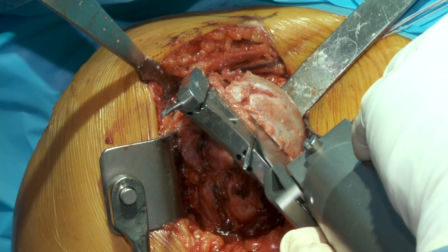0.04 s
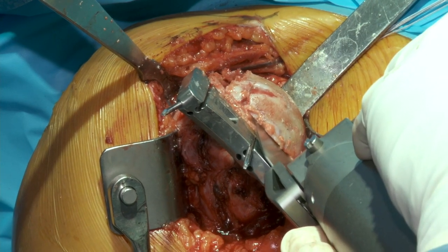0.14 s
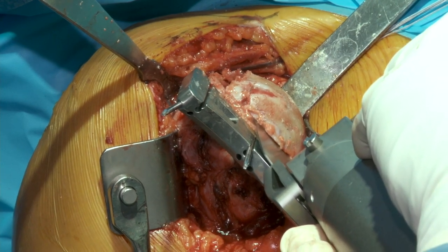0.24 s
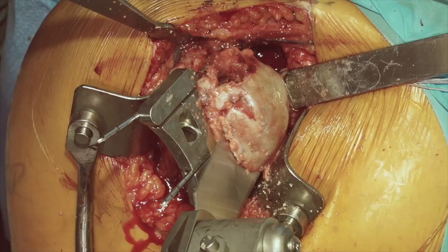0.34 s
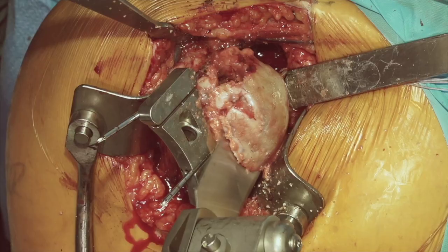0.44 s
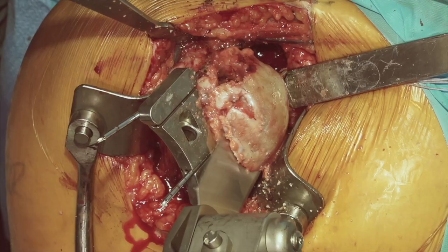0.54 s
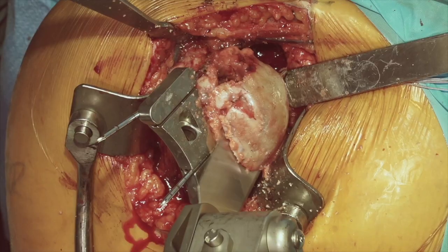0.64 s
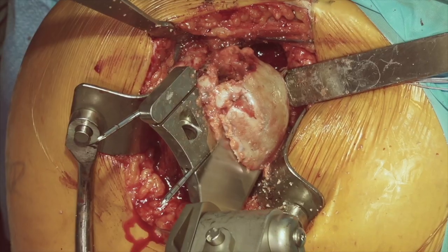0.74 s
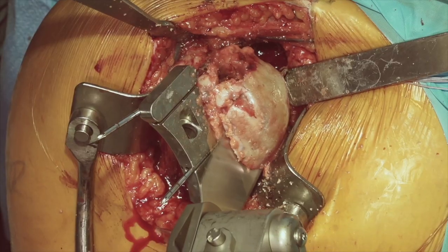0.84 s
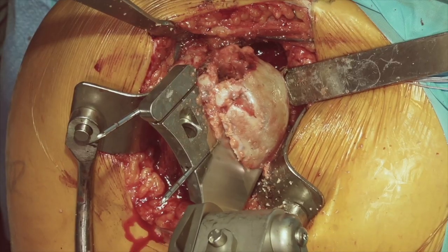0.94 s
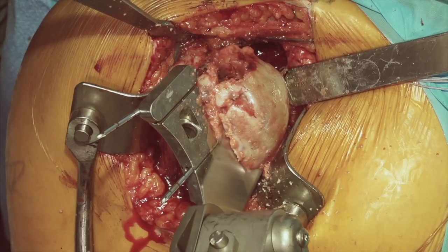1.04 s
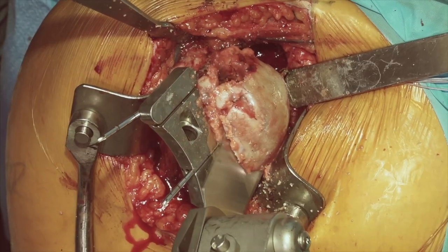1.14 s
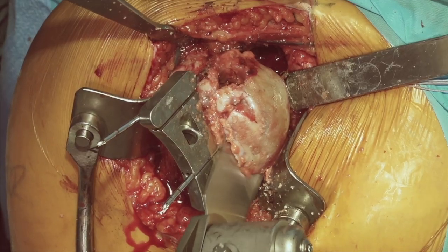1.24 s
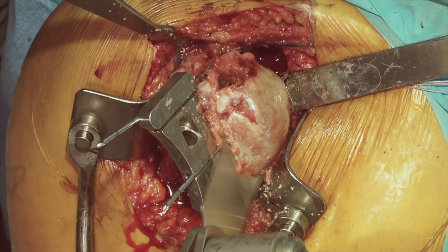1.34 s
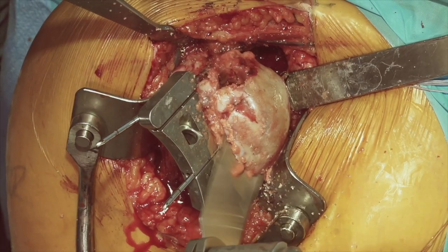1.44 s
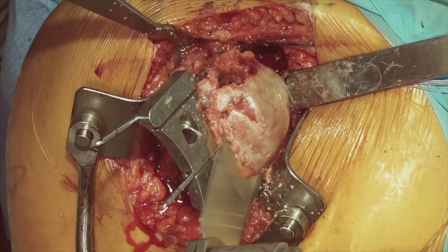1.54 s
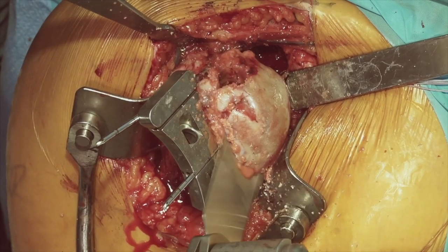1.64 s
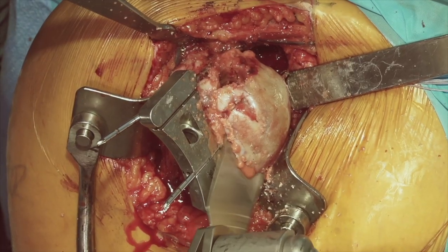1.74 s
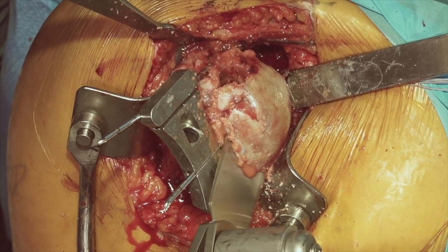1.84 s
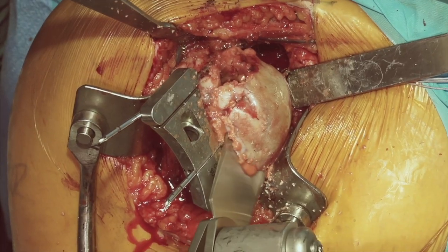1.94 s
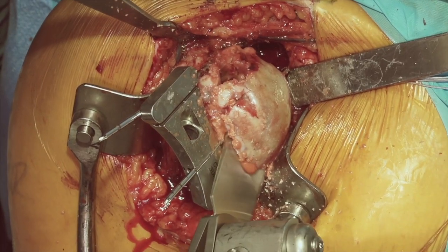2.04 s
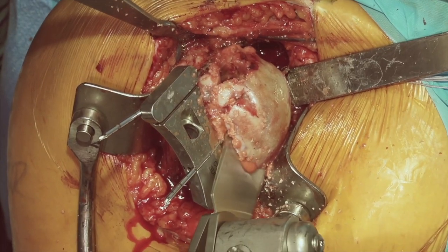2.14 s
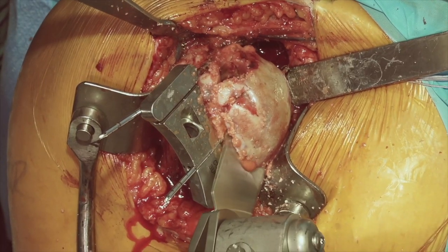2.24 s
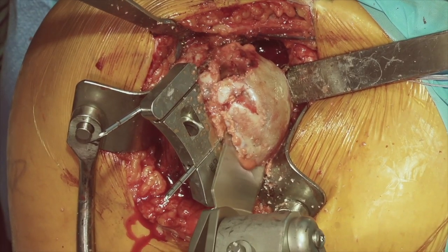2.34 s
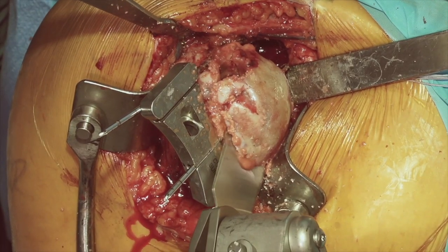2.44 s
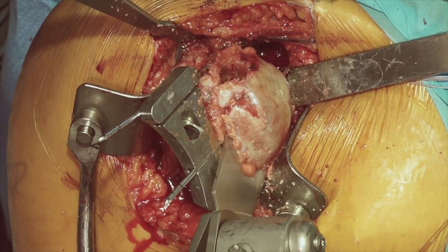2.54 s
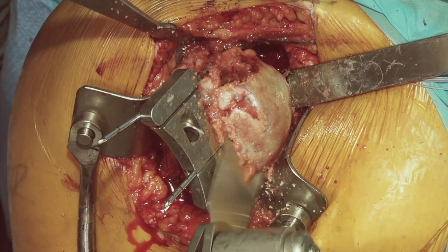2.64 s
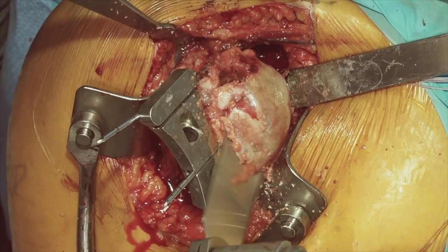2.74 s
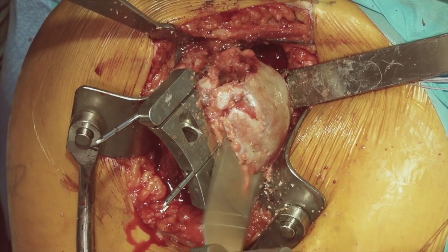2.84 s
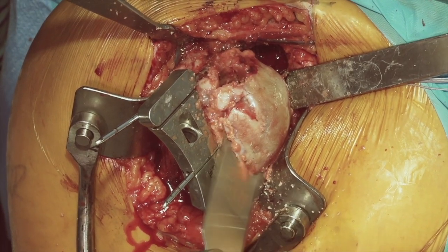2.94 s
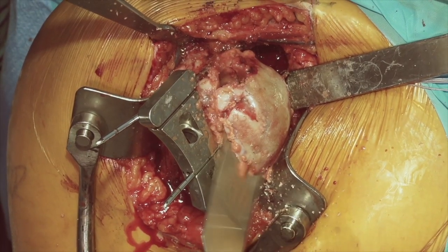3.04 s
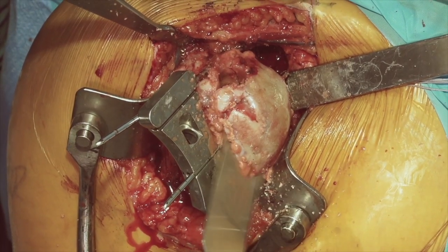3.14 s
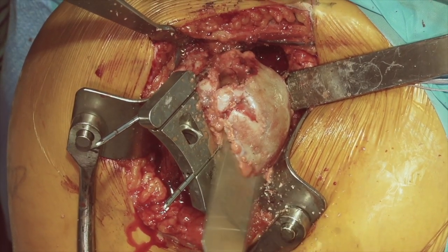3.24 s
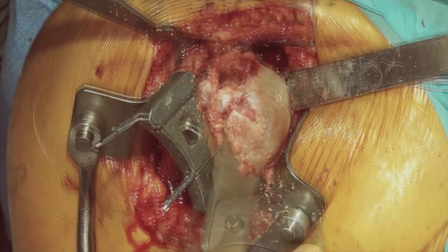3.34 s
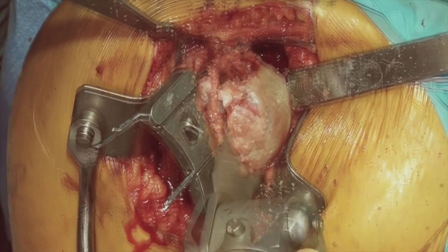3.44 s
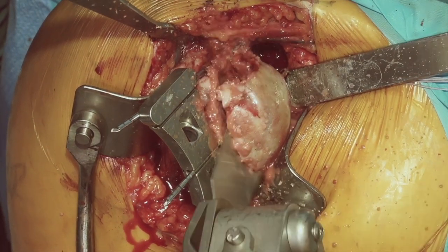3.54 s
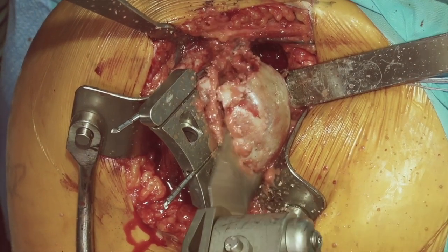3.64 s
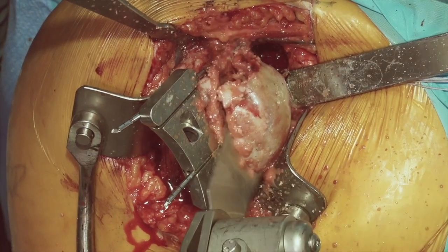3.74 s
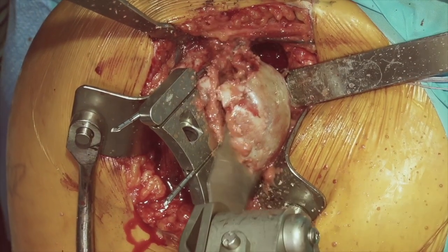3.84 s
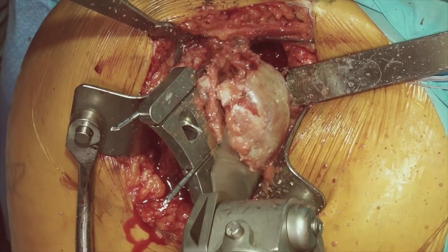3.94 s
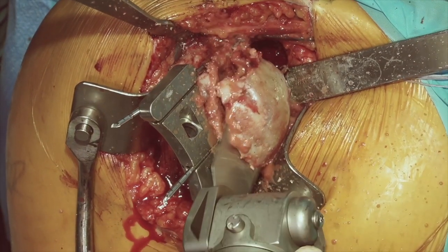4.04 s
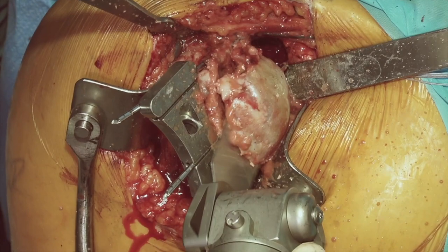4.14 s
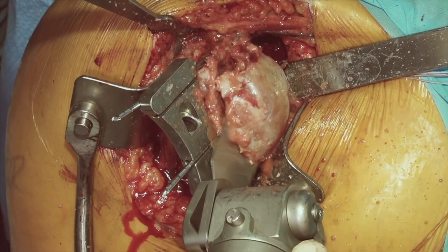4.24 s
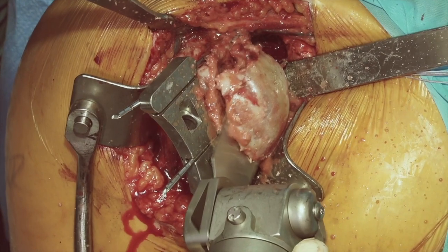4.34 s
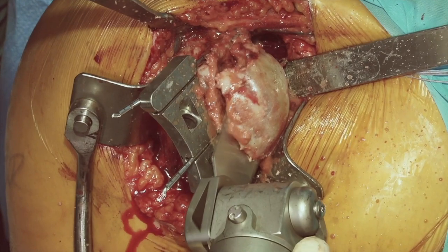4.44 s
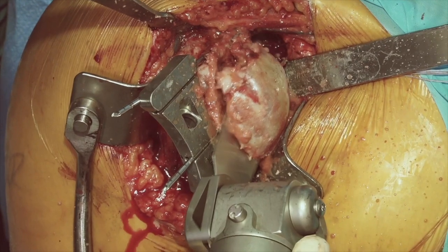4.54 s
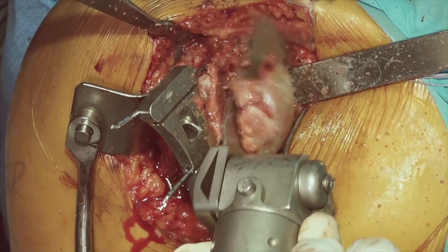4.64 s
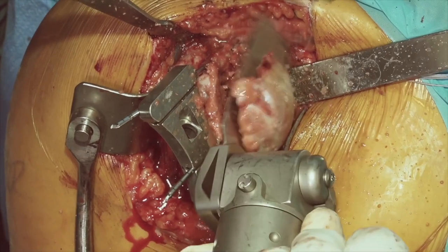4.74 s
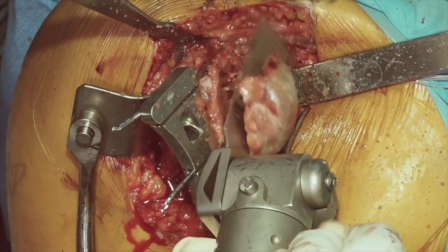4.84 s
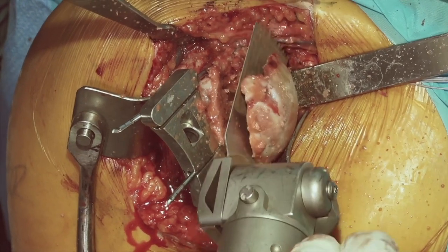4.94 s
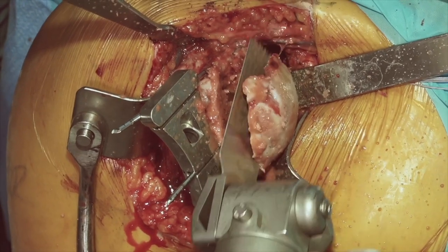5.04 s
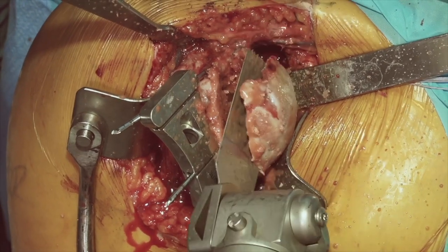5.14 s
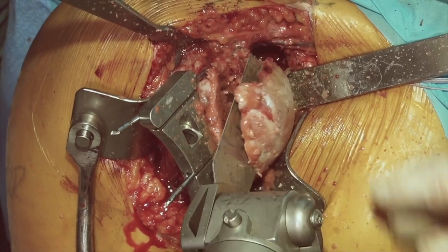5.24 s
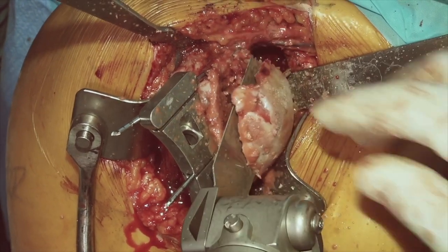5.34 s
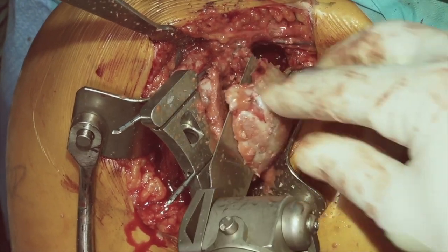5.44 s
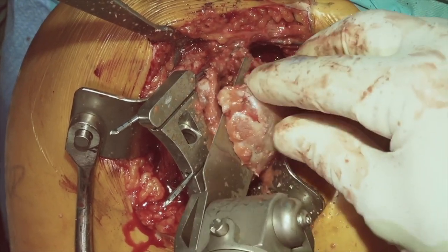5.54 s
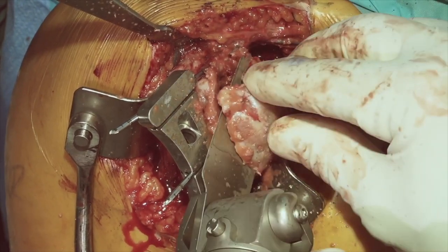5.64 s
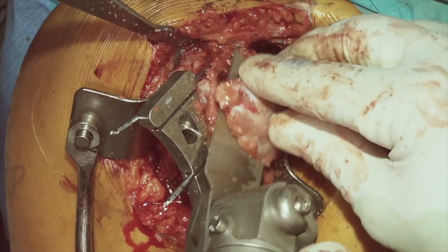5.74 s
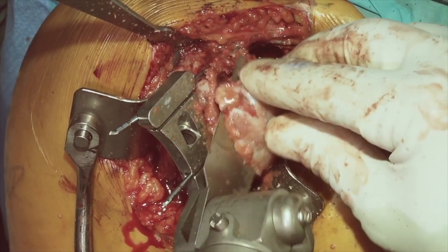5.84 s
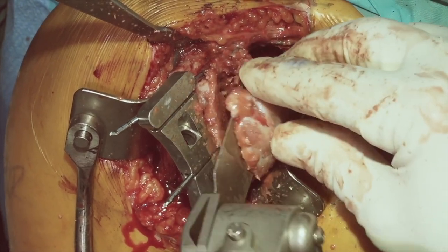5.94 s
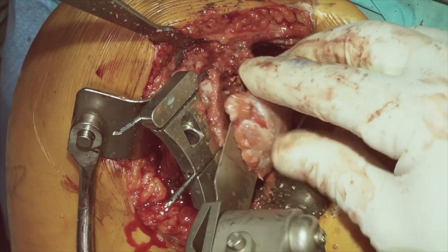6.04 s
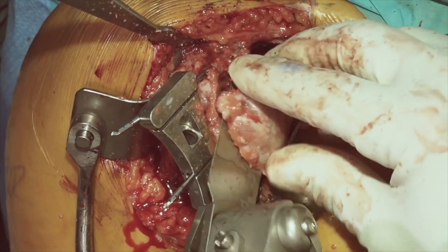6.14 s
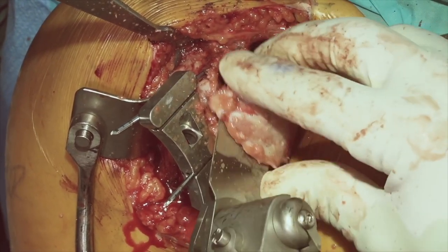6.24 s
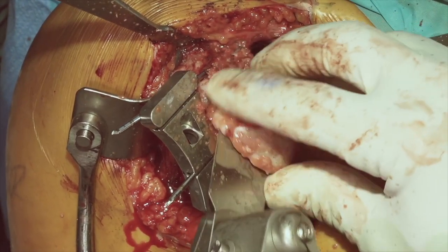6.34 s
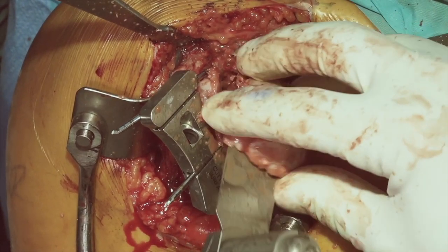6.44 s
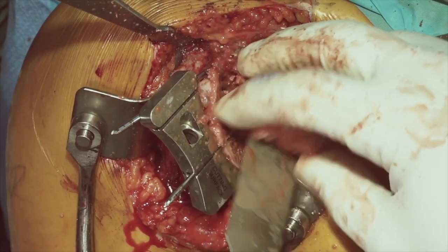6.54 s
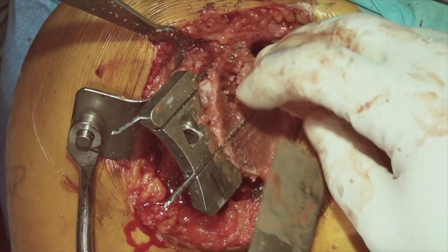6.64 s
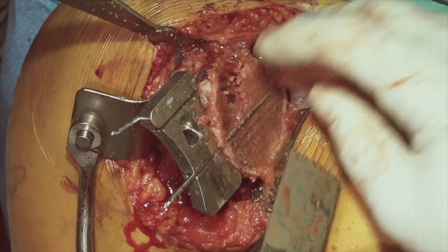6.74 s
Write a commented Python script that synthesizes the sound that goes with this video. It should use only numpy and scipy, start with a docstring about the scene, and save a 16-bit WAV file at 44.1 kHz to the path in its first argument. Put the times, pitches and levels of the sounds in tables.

```python
"""First heard, close to the microphone in an operating room: a powered oscillating saw cuts bone along a steel guide.
Knocks and tooth contacts on every stroke excite steel colours and resonances, with chatter, skids and rasps.
It cracks through and stops. Under it lie shaped-noise hiss like suction, low rumble swells, air and faint tones.
Then come soft ticks from bursts of grit, rubbing gloves with one sine squeak, and a blade rung by friction noise."""
import sys
import numpy as np
from scipy import signal
from scipy.fft import rfft, irfft
from scipy.io import wavfile
from scipy.ndimage import uniform_filter1d, map_coordinates

SR = 44100
rng = np.random.default_rng(int(sys.argv[2]) if len(sys.argv) > 2 else 0)


def persist_wave(psi):
    """Save psi, clipped to +-1, as 16-bit WAV."""
    counts = np.round(np.clip(psi, -1, 1) * 32767).astype(np.int16)
    wavfile.write(sys.argv[1], SR, np.atleast_2d(counts).T)


N = 299880


def from_db(db):
    """Decibels to gain."""
    return 10 ** (np.asarray(db) / 20)


def rms_one(x):
    """Scale to unit rms."""
    return x / np.sqrt(np.mean(x ** 2) + 1e-20)


def seconds():
    """Time of every sample."""
    return np.arange(N) / SR


def in_time(rows):
    """Each column of a curve at every sample."""
    s, *columns = np.transpose(rows)
    return [np.interp(seconds(), s, c) for c in columns]


def ramp(middle_s, takes_s):
    """Straight rise from 0 to 1, half way at middle_s."""
    return np.clip((seconds() - middle_s) / takes_s + .5, 0, 1)


def spell(start_s, end_s, fade_s):
    """Rise at start_s and fall at end_s."""
    return ramp(start_s, fade_s) - ramp(end_s, fade_s)


def snap(start_s, decay_s):
    """An abrupt rise and an exponential fall."""
    age = seconds() - start_s
    return (age > 0) * np.exp(-np.abs(age) / decay_s)


def drift(rate, t):
    """Smooth random curve around 0 with a spread near 1, `rate` knots per unit of t."""
    knots, fine = 512, 16
    curve = signal.resample(rng.standard_normal(knots), knots * fine)
    return np.interp(t * rate % knots * fine, np.arange(knots * fine), curve)


def coloured(x, spectrum):
    """Give x a smooth spectrum; rms 1."""
    hz, db = np.transpose(spectrum)
    bins = np.maximum(np.fft.rfftfreq(N, 1 / SR), 1)
    gain = from_db(np.interp(np.log(bins), np.log(hz), db))
    return rms_one(irfft(rfft(x) * gain, N))


def band(x, low_hz, high_hz, order=4):
    """Butterworth band-pass."""
    return signal.sosfilt(signal.butter(order, [low_hz, high_hz], "band", fs=SR, output="sos"), x)


def resonance(x, hz, width_hz):
    """One resonance with gain near 1 on top."""
    r = np.exp(-np.pi * width_hz / SR)
    zeros = np.array([1, 0, -1]) * (1 - r * r) / 2
    return signal.lfilter(zeros, [1, -2 * r * np.cos(2 * np.pi * hz / SR), r * r], x)


def evened(x, span_s=0.15):
    """Hold the short-term rms near 1."""
    size = int(span_s * SR / 2)
    power = uniform_filter1d(uniform_filter1d(x * x, size), size)
    return x / np.sqrt(np.abs(power) + 1e-12)


def lifted(x, rows, fade_s):
    """Blade modes swell and fade as the free length and the grip of the slot change."""
    out = x
    for start, end, hz, width_hz, lift_db in rows:
        grip = spell(start, end, fade_s)
        out = out + grip * (from_db(lift_db) - 1) * resonance(x, hz, width_hz)
    return out


# dull colour of the room air, also of the gloves' rub: f/Hz, relative level/dB per Hz
DULL_COLOUR = [(25, -8.5), (65, 1), (150, -6.5), (350, -5), (570, -7), (1200, -13), (1800, -16),
               (3400, -22.5), (5000, -22.5), (8000, -67)]
AIR_DB = -67.5


def room_air():
    """Steady noise of the room, coloured dull."""
    return from_db(AIR_DB) * coloured(rng.standard_normal(N), DULL_COLOUR)


# equipment tones: f/Hz, rms level/dB around which each wavers
EQUIPMENT_TONES = [(1570, -80.5), (586, -84), (3564, -92)]
TONE_WAVER_DB, TONE_WAVER_PER_S = 2.6, 9.0


def equipment():
    """Steady sine pitches whose levels waver independently."""
    t, out = seconds(), 0
    for hz, db in EQUIPMENT_TONES:
        level = from_db(db + TONE_WAVER_DB * drift(TONE_WAVER_PER_S, t))
        out = out + level * np.sqrt(2) * np.sin(2 * np.pi * hz * t)
    return out


# swells of rumble: t/s at the top, level/dB added to the bed
RUMBLE_SWELLS = [(.5, -60), (2.82, -56.5), (5.0, -64), (6.78, -55.5)]
SWELL_RISE_S, SWELL_FALL_S, RUMBLE_BED_DB = 0.14, 0.17, -72


def swells():
    """Gain of the rumble: a steady bed and swells that rise faster than they fall."""
    t, gain = seconds(), from_db(RUMBLE_BED_DB)
    for top_s, db in RUMBLE_SWELLS:
        side_s = np.where(t < top_s, SWELL_RISE_S, SWELL_FALL_S)
        gain = gain + from_db(db) * np.exp(-((t - top_s) / side_s) ** 2)
    return gain


# colour of the rumble: f/Hz, relative level/dB per Hz
RUMBLE_COLOUR = [(25, -21), (50, -21), (100, -3), (160, 0), (220, -2.5), (330, -10.5), (600, -24),
                 (1200, -63)]


def rumble():
    """Low noise that swells."""
    return swells() * coloured(rng.standard_normal(N), RUMBLE_COLOUR)


# thin hiss before its trim: t/s, level/dB
HISS_CURVE = [(4.9, -58), (5.15, -60), (5.4, -65), (5.7, -61.5), (6.1, -58.5), (6.55, -60), (6.8, -55.5)]
# colour of the hiss: f/Hz, relative level/dB per Hz
HISS_COLOUR = [(1200, -34), (2500, -19), (3500, -14), (5000, -15), (7500, -10.5), (10000, -9), (13800, -3),
               (15700, -3.5)]


def hiss(trim_db=-0.1, echo=0.27, path_s=0.0026):
    """Noise like suction, with a near reflection whose path shifts slowly."""
    t = seconds()
    jet = rng.standard_normal(N)
    lag = path_s * (1 + 0.13 * drift(2.9, t))
    jet = jet + echo * map_coordinates(jet, [(t - lag) * SR], order=3)
    return from_db(in_time(HISS_CURVE)[0] + trim_db) * coloured(jet, HISS_COLOUR)


def background():
    """The bed behind the close sounds."""
    return hiss() + rumble() + room_air() + equipment()


ROOM_T60_S, ROOM_DB = 0.6, -20


def room(x, treble_t60_s=0.013, treble_db=-3):
    """Diffuse tail of a hard-walled room; the treble dies sooner."""
    t = np.arange(SR) / SR
    low, high = rng.standard_normal((2, SR))
    low_tail = band(low, 300, 4400, order=2) * from_db(-60 * t / ROOM_T60_S)
    high_tail = band(high, 6100, 12000, order=2) * from_db(treble_db - 60 * t / treble_t60_s)
    tail = (low_tail + high_tail) * (t > .006)   # silent until the first reflection
    tail = tail / np.sqrt(np.sum(tail ** 2) * 2)   # energy one half
    return from_db(ROOM_DB) * signal.fftconvolve(x, tail)[:N]


# modes of the blade as it slides out: f/Hz, width/Hz, rms level/dB before the fade-in
SLIDE_MODES = [(2030, 200, -70), (4400, 100, -71)]
SLIDE_S = 6.72
HANDLING_FADE_S = 0.11   # for the slide and the gloves


def slide():
    """Friction sets two modes of the idle blade ringing faintly as it slides out."""
    friction = rng.standard_normal(N)
    modes = sum(from_db(db) * rms_one(resonance(friction, hz, width)) for hz, width, db in SLIDE_MODES)
    return ramp(SLIDE_S, HANDLING_FADE_S) * modes


# the gloved hand steadies the slice, then lifts it out:
# from t/s, to t/s, dull rub level/dB, rustle level/dB before its crinkle
GLOVE_RUBS = [(5.85, 6.51, -65.5, -95), (6.71, 6.9, -62, -74)]
SQUEAK_S, SQUEAK_HZ = 6.04, 3300   # its middle, and the pitch it wavers around


def gloves(crinkle_db=-3.0, squeak_waver_hz=35, squeak_db=-79, squeak_lasts_s=0.078):
    """Rubber rubs over wet bone: a dull rub, a crinkling rustle and one faint squeak."""
    t = seconds()
    rub = coloured(rng.standard_normal(N), DULL_COLOUR)
    scratch = rms_one(band(rng.standard_normal(N), 1400, 5000, order=2))
    rustle = from_db(crinkle_db * drift(60, t)) * scratch
    pitch = SQUEAK_HZ + squeak_waver_hz * drift(60, t)
    whistle = rms_one(np.sin(2 * np.pi * np.cumsum(pitch) / SR))
    out = from_db(squeak_db) * np.exp(-((t - SQUEAK_S) / squeak_lasts_s) ** 2) * whistle
    for start, end, rub_db, rustle_db in GLOVE_RUBS:
        touch = from_db(rub_db) * rub + from_db(rustle_db) * rustle
        out = out + spell(start, end, HANDLING_FADE_S) * touch
    return out


# the loose slice of bone ticks on the blade: t/s, level/dB before the trim
BONE_TICKS = [(5.558, -60), (5.617, -57), (5.624, -62), (5.703, -50.5), (5.769, -57), (5.829, -67),
              (6.7194, -61)]


def ticks(decay_s=0.0032, trim_db=-3, ring_hz=3900, ring_width_hz=1500, ring_db=3):
    """Short damp cracks with a touch of steel."""
    grit = band(rng.standard_normal(N), 2000, 9980, order=1)
    blows = sum(from_db(db + trim_db) * snap(s, decay_s) for s, db in BONE_TICKS)
    return blows * rms_one(grit + from_db(ring_db) * resonance(grit, ring_hz, ring_width_hz))


# the blade snags, cracks the last bridge of bone and grates as it stops:
# t/s, level/dB of the noise at the onset, f/Hz, width/Hz, decay/s
BONE_CRACKS = [(3.305, -39, 4500, 5000, 0.044), (4.553, -34.5, 2717, 894, 0.013),
               (4.566, -19.5, 10620, 6000, 0.017), (4.569, -59, 1200, 1200, .012),
               (4.587, -27.5, 10100, 6000, 0.036), (4.591, -47, 900, 1000, 0.0095),
               (4.606, -44, 3320, 1800, 0.0057), (4.833, -42, 2730, 450, 0.0091)]


def cracks():
    """Short bursts of splintering: noise through one resonance each."""
    grit, out = rng.standard_normal(N), 0
    for s, db, hz, width_hz, decay_s in BONE_CRACKS:
        out = out + from_db(db) * snap(s, decay_s) * rms_one(resonance(grit, hz, width_hz))
    return out


# the teeth lose their groove and skid: from t/s, to t/s, skid 0-1
SKID_SPELLS = [(-.05, 0.044, .4), (0.219, .3, 0.13), (0.436, 0.493, 0.21), (1.15, 1.191, 0.11),
               (1.254, 1.399, .36), (2.472, 2.531, 0.18), (1.511, 1.55, 0.32), (1.623, 1.677, .3),
               (1.968, 2.029, 0.35), (2.53, 2.783, 0.13), (2.625, 2.71, 0.48), (2.993, 3.07, 0.21),
               (3.082, 3.155, 0.62), (3.305, 3.345, 0.76), (3.352, 3.417, .35), (3.803, 3.872, .35),
               (3.917, 4.019, .3), (4.1, 4.2, 0.31), (4.223, 4.28, .75), (4.29, 4.437, 0.14),
               (4.55, 4.649, 0.93), (4.649, 4.716, 0.39), (4.793, 4.901, 1)]
SKID_FADE_S = 0.017   # time to slip in or out


def skidding():
    """How far the teeth are out of their groove, 0-1."""
    return np.clip(sum(depth * spell(start, end, SKID_FADE_S) for start, end, depth in SKID_SPELLS), 0, 1)


# the housing's hum: t/s, then level/dB at 2, 3 and 4 times the stroke rate
HOUSING_HUM = [(0, -71, -56.5, -62), (.25, -68, -56.5, -65), (.6, -67, -55, -56), (.95, -67, -53, -54),
               (1.3, -65, -56, -58), (1.42, -64, -66, -62), (1.58, -62, -55, -52), (1.72, -73, -59, -61),
               (1.92, -72, -57, -70), (2.05, -70, -56, -63), (2.4, -69, -61, -53), (2.65, -66, -63, -62),
               (2.9, -70, -65, -58), (3.25, -67, -63, -55), (3.5, -67, -69, -63), (3.75, -77, -58, -52),
               (3.95, -62, -64, -66), (4.3, -62, -57, -58), (4.52, -63, -58, -66), (4.79, -66, -64, -64)]


def housing(turns, skid, shake_db=-12, rub_db=-60, steady_rub=0.48):
    """The handpiece shakes once per stroke and hums on the next three multiples, over a dull rub."""
    levels = in_time(HOUSING_HUM)
    levels = [levels[1] + shake_db] + levels   # the shake follows the hum at 3 times the rate
    tones = 0
    for k, db in enumerate(levels, 1):
        tones = tones + from_db(db) * np.sqrt(2) * np.sin(2 * np.pi * (k * turns + rng.random()))
    rub = rms_one(band(rng.standard_normal(N), 450, 1160, order=2))
    return tones + from_db(rub_db) * (steady_rub + skid) * rub


# clean vibration of the drive: multiple of the stroke rate, relative level/dB around which it sways
DRIVE_HARMONICS = [(5, 2), (6, 0), (7, 4), (8, 5.5), (9, 1)]


def drive(turns, sway_db=3):
    """The swinging mechanism shakes the housing at clean multiples of the stroke rate."""
    out = 0
    for k, db in DRIVE_HARMONICS:
        level = from_db(db + sway_db * drift(8, seconds()))
        out = out + level * np.sin(2 * np.pi * (k * turns + rng.random()))
    return rms_one(out)


def buzz(turns, count=42, middle=18.0, spread=0.0452, scatter=0.82, top_hz=6500):
    """Each reversal flexes the blade; the bending wave smears in time but keeps an even comb of harmonics."""
    out, wander = 0, drift(3.0, seconds())
    mean_rate = turns[-1] * SR / N
    for k in range(3, count):
        offset, sway = scatter * rng.standard_normal(2)
        gain = 1 / np.hypot(1, (k * mean_rate / top_hz) ** 2)
        smear = spread * (k - middle) ** 2 / 2
        out = out + gain * np.cos(2 * np.pi * (k * turns + smear) + offset + sway * wander)
    return rms_one(out)


def chips(chatter, per_s=65.0, size_db=-2.0):
    """Splinters of bone crack off at random, more often as the blade chatters."""
    born = rng.random(N) < per_s * chatter / SR
    size = from_db(size_db * np.clip(rng.standard_normal(N), -2, 1))
    return born * rng.choice([-1, 1], N) * size


JITTER_S, SKID_S = 8e-6, 5e-5   # timing scatter of a tooth at full chatter, and added in a full skid
SHIFT_PER_S, SKID_SHIFT_PER_S = 8.5, 48.0   # rate of new bites, and added in a full skid


def contacts(turns, chatter, skid, count=28, bunch_db=-1.0, reversal_db=1.5, uneven_db=3.5, creep_s=3e-5):
    """Teeth catch near fixed places in each stroke, hardest near one reversal; their bite shifts as the cut deepens."""
    t, strokes = seconds(), np.arange(int(turns[-1]) - 1)
    fine = 4   # oversampling, for timing finer than a sample
    clicks = np.zeros(fine * N)
    progress = np.cumsum(SHIFT_PER_S + SKID_SHIFT_PER_S * skid) / SR
    for k in range(count):
        place = (k + rng.random()) / count
        at = np.interp(strokes + place, turns, t)
        rough = np.interp(at, t, chatter)
        scatter, force = rng.standard_normal((2, 2048))[:, :len(at)]
        place_db = bunch_db * np.cos(2 * np.pi * place) + reversal_db * np.cos(4 * np.pi * place)
        db = place_db + uneven_db * rough * force
        # the sign of the bite pushes or pulls the blade
        bite = np.tanh(drift(1, np.interp(at, t, progress) + rng.random()))
        jitter = (JITTER_S * rough + SKID_S * np.interp(at, t, skid)) * scatter
        at = at + creep_s * drift(6, at) + jitter
        np.add.at(clicks, np.clip(at * SR * fine, 0, fine * N - 1).astype(int), bite * from_db(db))
    return rms_one(signal.resample_poly(clicks, 1, fine))


def blade_echoes(x, count=6, share=0.22, trip_s=.0022):
    """Bending waves bounce between tip, slot and clamp, carving the treble into shifting ridges."""
    treble, out = band(x, 4300, 16000, order=2), x
    shifts_per_s = 7
    for lag in (rng.uniform(.2, 1, count) * trip_s * SR).astype(int):
        out = out + share * drift(shifts_per_s, seconds()) * np.roll(treble, lag)
    return out


# drone of the bone: t/s, level/dB
DRONE_CURVE = [(0.0, -51), (0.17, -48), (0.39, -61), (0.47, -52), (1.18, -47.5), (1.26, -56), (1.36, -44),
               (1.38, -51), (1.6, -45), (1.83, -56), (1.9, -52), (2.15, -56.5), (2.33, -46.5),
               (2.69, -52.5), (2.79, -44), (2.98, -41), (3.26, -61), (3.38, -57.5), (3.54, -46),
               (3.78, -41.5), (3.93, -63.5), (3.98, -43.5), (4.09, -56.5), (4.5, -49), (4.63, -62),
               (4.8, -59)]
# whine just above it: t/s, level/dB
WHINE_CURVE = [(0.0, -48), (0.17, -44), (0.37, -46.5), (0.59, -43.5), (2.41, -43.5), (2.47, -40.5),
               (2.66, -47), (2.89, -38), (2.91, -40.5), (3.41, -47), (3.46, -55), (3.54, -44),
               (3.85, -41.5), (3.94, -50), (3.97, -44), (4.18, -50.5), (4.53, -49), (4.8, -52.5)]
# rattle of the blade before its trim: t/s, level/dB
RATTLE_CURVE = [(0.0, -30.5), (0.03, -34), (0.72, -34), (1.0, -31), (1.299, -33.5), (1.39, -29),
                (1.58, -35.5), (2.08, -31.5), (2.38, -34.5), (2.449, -31), (2.63, -37.5), (2.67, -34.5),
                (3.311, -34.5), (3.42, -41.5), (3.6, -34.5), (4.22, -33.5), (4.33, -31), (4.59, -37.5),
                (4.64, -42.5), (4.67, -37.5), (4.8, -38)]
# how hard the teeth bite, as the level of their sizzle: t/s, level/dB
BITE_CURVE = [(0.0, -26), (0.13, -23.5), (0.49, -26), (1.11, -26.5), (1.349, -28.5), (2.12, -24),
              (2.53, -25.5), (2.67, -33), (2.71, -30), (3.29, -24.5), (3.4, -34.5), (3.759, -26.5),
              (4.42, -25), (4.49, -25.5), (4.59, -25), (4.62, -30.5), (4.645, -33), (4.67, -25.5),
              (4.75, -30), (4.795, -29)]
# the blade is drawn back along the guide and scrapes more: from t/s, to t/s, lift of level/dB
DRAW_BACK = (2.8, 3.36, 3.1)


def register_levels(drone_db=0.0, whine_db=0.0, rattle_db=0.47, scrape_db=-10.0, sizzle_db=0.0, fade_s=0.17):
    """Levels of the five registers in dB; scrape and sizzle both follow the bite."""
    curves = (DRONE_CURVE, WHINE_CURVE, RATTLE_CURVE, BITE_CURVE)
    (drone,), (whine,), (rattle,), (bite,) = map(in_time, curves)
    start, end, lift_db = DRAW_BACK
    scrape = bite + scrape_db + lift_db * spell(start, end, fade_s)
    return [drone + drone_db, whine + whine_db, rattle + rattle_db, scrape, bite + sizzle_db]


# blade speed before its scatter: t/s, strokes per s
STROKE_RATE = [(0.014, 191.9), (0.116, 195.8), (0.136, 193.9), (0.161, 196.9), (0.231, 194.2),
               (0.256, 197.3), (0.295, 196.1), (0.311, 197.7), (0.349, 197.2), (0.379, 194.2),
               (0.469, 197.2), (0.492, 194.7), (0.551, 197.0), (0.576, 194.1), (0.621, 198.0),
               (0.794, 195.8), (0.81, 194.0), (0.83, 196.7), (1.039, 195.3), (1.111, 198.7), (1.141, 197.6),
               (1.161, 193.8), (1.2, 198.9), (1.277, 196.5), (1.315, 200.2), (1.367, 192.4), (1.408, 197.8),
               (1.458, 198.3), (1.537, 193.5), (1.565, 195.7), (1.605, 194.1), (1.633, 189.1),
               (1.644, 190.2), (1.678, 199.7), (1.726, 194.7), (1.866, 190.2), (1.907, 192.4),
               (2.027, 190.0), (2.054, 192.5), (2.154, 193.0), (2.184, 195.3), (2.288, 192.8),
               (2.458, 196.0), (2.492, 191.5), (2.556, 198.6), (2.61, 200.5), (2.626, 197.3),
               (2.653, 199.0), (2.696, 193.8), (2.737, 196.9), (2.766, 194.4), (2.807, 196.0),
               (2.893, 193.3), (2.946, 195.8), (3.039, 192.6), (3.054, 195.9), (3.093, 197.5),
               (3.152, 194.5), (3.299, 195.8), (3.32, 193.7), (3.363, 197.0), (3.385, 194.9),
               (3.435, 196.1), (3.51, 193.5), (3.569, 197.0), (3.608, 194.7), (3.662, 196.4),
               (3.796, 194.7), (3.848, 189.5), (3.93, 192.4), (3.98, 185.9), (4.02, 196.1), (4.1, 189.6),
               (4.125, 191.4), (4.154, 186.9), (4.19, 189.9), (4.231, 190.4), (4.243, 188.7),
               (4.286, 193.5), (4.306, 190.4), (4.34, 192.7), (4.44, 192.9), (4.478, 190.4), (4.578, 194.9),
               (4.592, 193.5), (4.624, 197.0), (4.637, 201.2), (4.671, 195.3), (4.778, 197.3),
               (4.798, 191.2)]
# how unevenly the teeth catch as they cut: t/s, chatter 0-1
CHATTER_CURVE = [(0, 0.9), (.2, 0.9), (0.419, 0.94), (0.531, 0.93), (.92, 0.84), (1.24, 0.8), (1.342, 0.66),
                 (1.45, 0.9), (1.661, 0.83), (1.751, 0.82), (2.35, 0.69), (2.75, 0.92), (3.27, 0.83),
                 (3.32, 1), (3.42, 0.83), (3.721, 0.88), (4.09, 0.81), (4.2, 0.95), (4.53, 0.85), (4.56, 1),
                 (4.63, 1), (4.7, 0.95)]
# how hard the blade slaps the slot once per stroke: t/s, extra gain at the slap
SLOT_SLAP = [(0, 1.0), (.35, 1.2), (.65, .8), (.85, .05), (1.12, .1), (1.22, 1.0), (1.4, .3), (1.95, .3),
             (2.15, .9), (2.4, .45), (3.3, .3), (3.8, .4), (3.95, 1.0), (4.15, .3), (4.75, .5)]
# colour of blade and guide: f/Hz, relative level/dB per Hz
STEEL_COLOUR = [(300, -41), (700, -27.5), (1400, -13.5), (1800, -14), (2300, -11), (2950, -6), (3550, -9.5),
                (4150, -5), (4700, -11), (6200, -13), (8200, -11), (9400, -2), (12600, 0.5), (15800, -1)]
# the wedged blade rings: from t/s, to t/s, f/Hz, width/Hz, lift of level/dB before the registers are evened
WEDGED_RINGS = [(0, 0.417, 10800, 410, 5), (0, 0.496, 9200, 400, 6.5), (0, 0.285, 2330, 200, 6),
                (0, 0.453, 5080, 158, 10), (0.094, 0.226, 4620, 120, 9), (0.267, 0.45, 4140, 250, 5),
                (0.51, 1.155, 2430, 250, 6), (0.9, 1.267, 11500, 300, 6), (0.613, 1.256, 9390, 300, 7.5),
                (0.688, 1.097, 5390, 250, 4), (0.4, 1.15, 2940, 180, 5.5), (1.3, 1.53, 3860, 598, 8.5),
                (1.62, 2.351, 11200, 299.3, 2), (1.71, 2.389, 1554, 121.4, 7.5),
                (1.777, 2.612, 12580, 398, 6), (1.831, 2.455, 2950, 220, 5), (1.98, 2.226, 3900, 303.9, 7),
                (1.997, 2.59, 10320, 247, 9.5), (2.25, 2.602, 13310, 250, 4), (2.609, 2.79, 3700, 800, 9),
                (2.912, 3.021, 990, 120, 7), (2.901, 3.315, 14440, 400, -2), (3.149, 3.384, 3330, 400, 6.5),
                (2.95, 3.391, 7430, 599, 9.5), (3.495, 3.9, 1155, 75, 10), (3.496, 3.74, 4300, 244.5, 5.5),
                (3.5, 3.658, 3757, 119.6, 11), (3.52, 3.87, 5850, 200, 1), (3.62, 3.93, 9100, 500, 5),
                (3.697, 4.444, 3320, 500, 6), (3.869, 4.54, 12310, 250, 6), (4.001, 4.519, 2096, 200, 6),
                (4.553, 4.821, 9640, 296, 2), (4.638, 4.827, 7100, 220, 15), (4.648, 4.85, 2710, 160, 7)]
# brief rasps as the blade bites into harder bone: from t/s, to t/s, f/Hz, width/Hz, lift of level/dB
HARD_BONE_RASPS = [(0.28, 0.393, 4100, 500, 3.5), (1.1, 1.16, 2620, 400, 2), (1.4, 1.44, 1506, 400, 3),
                   (1.49, 1.528, 3870, 902, 3), (1.605, 1.673, 2850, 600, 2.5),
                   (2.67, 2.732, 3850, 700, 3.5), (2.74, 2.807, 3000, 1211, 3),
                   (2.944, 3.017, 2950, 600, 4.5), (3.044, 3.1, 3400, 602, 5.5),
                   (3.59, 3.65, 4304, 600, 4.5), (3.731, 3.795, 3000, 500, 5)]
# edges of drone, whine, rattle, scrape and sizzle, in that order: f/Hz
REGISTER_EDGES = [880, 1270, 1850, 5500, 8700, 16000]
RING_FADE_S, RASP_FADE_S = .04, 0.0079
HUNT, HUNT_PER_S = .004, 60.0   # scatter of the strokes (share of the speed, times roughness) and its rate
RELEASE_S, RUN_DOWN_S = 4.799, 0.0165   # trigger let go, the sound dies away: start and decay time of the fade


def saw(buzz_db=-0.8, dust_db=-11.0, chip_db=12, drive_db=-22, grind_db=-22, flutter_db=0.59, flutter_per_s=22.0):
    """Tooth contacts, splinters and gritty bone dust excite the steel; the drive hums underneath."""
    (speed,), (chatter,), (slap,) = map(in_time, (STROKE_RATE, CHATTER_CURVE, SLOT_SLAP))
    t, skid = seconds(), skidding()
    scattered_speed = speed * (1 + HUNT * (chatter / 2 + skid) * drift(HUNT_PER_S, t))
    turns = np.cumsum(scattered_speed) / SR   # strokes so far
    dust_gain = from_db(dust_db) * (chatter + skid) * (1 + .5 * np.cos(2 * np.pi * turns))
    dust = dust_gain * rng.standard_normal(N)
    debris = band(dust + from_db(chip_db) * chips(chatter), 3500, 22000, order=1)
    # chatter and skids take away the even buzz
    flex = from_db(buzz_db) * np.sqrt(np.clip(1 - chatter, 0, 1)) * (1 - skid) * buzz(turns)
    knock = 1 + slap * np.cos(np.pi * turns) ** 8   # peaks once per stroke
    teeth = coloured(blade_echoes(knock * (contacts(turns, chatter, skid) + debris + flex)), STEEL_COLOUR)
    # a skid breaks the clean hum up into grinding
    hum = from_db(drive_db) * (1 - skid) * drive(turns)
    grind = from_db(grind_db) * skid * rms_one(band(rng.standard_normal(N), 1370, 2800, order=1))
    sound = lifted(teeth + hum + grind, WEDGED_RINGS, RING_FADE_S)
    # each register follows its level curve, and flutters as the blade chatters
    out = 0
    for db, low_hz, high_hz in zip(register_levels(), REGISTER_EDGES, REGISTER_EDGES[1:]):
        gain = from_db(db + flutter_db * chatter * drift(flutter_per_s, t))
        out = out + gain * evened(band(sound, low_hz, high_hz, order=8))
    out = lifted(out, HARD_BONE_RASPS, RASP_FADE_S) + housing(turns, skid)
    return out * np.exp(-np.maximum(t - RELEASE_S, 0) / RUN_DOWN_S)


def scene():
    """One close microphone feeds both channels."""
    near = slide() + gloves() + ticks() + cracks() + saw()
    return np.tile(near + room(near) + background(), (2, 1))


CUTOFF_HZ = 15750


def record(dry):
    """The top is cut steeply."""
    return signal.sosfilt(signal.ellip(12, .1, 80, CUTOFF_HZ, fs=SR, output="sos"), dry)


dry = scene()
out = record(dry)
persist_wave(out)
```